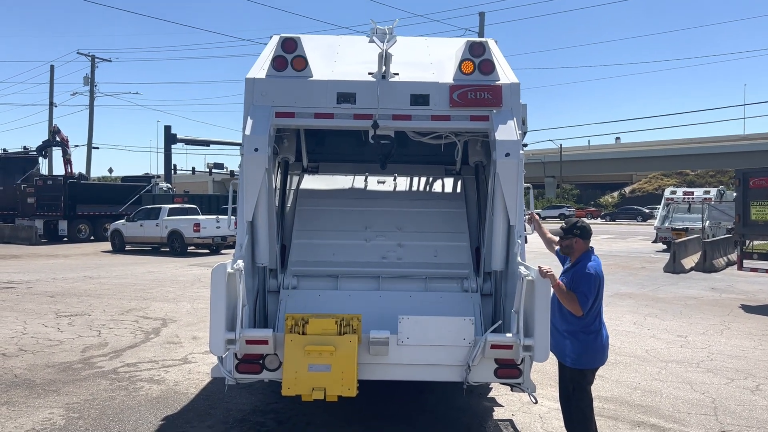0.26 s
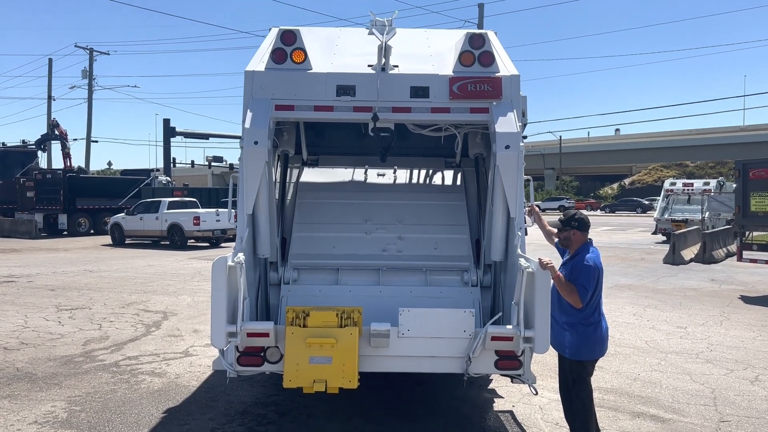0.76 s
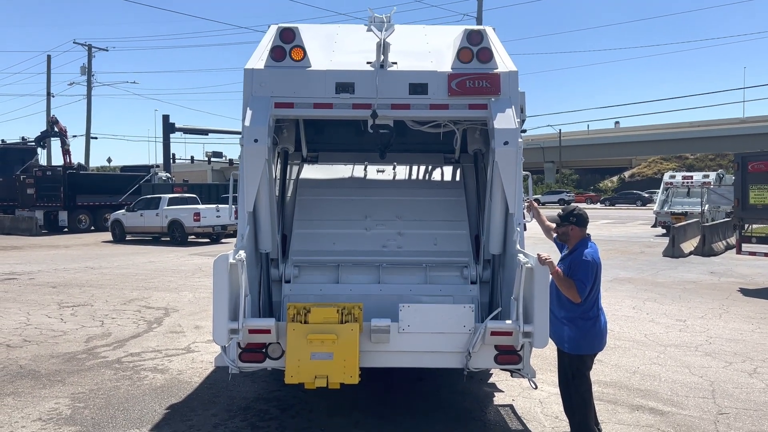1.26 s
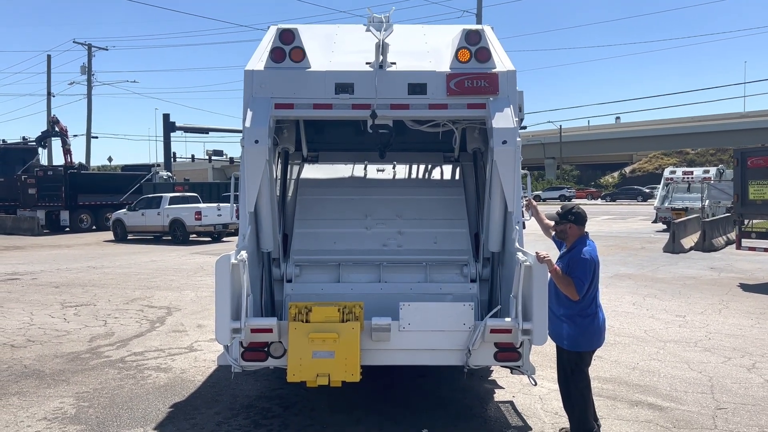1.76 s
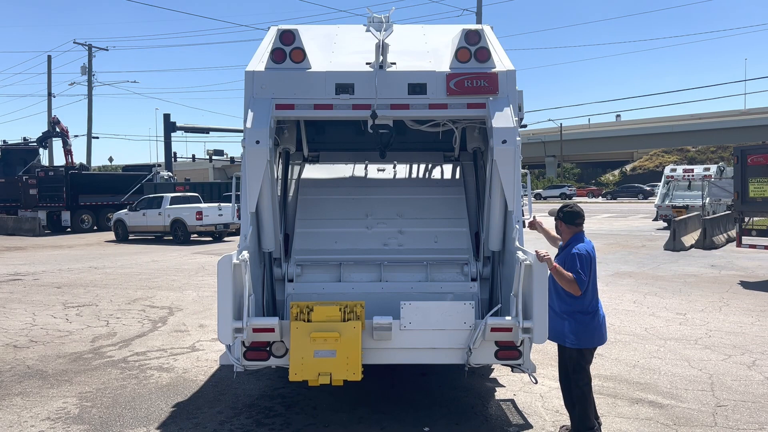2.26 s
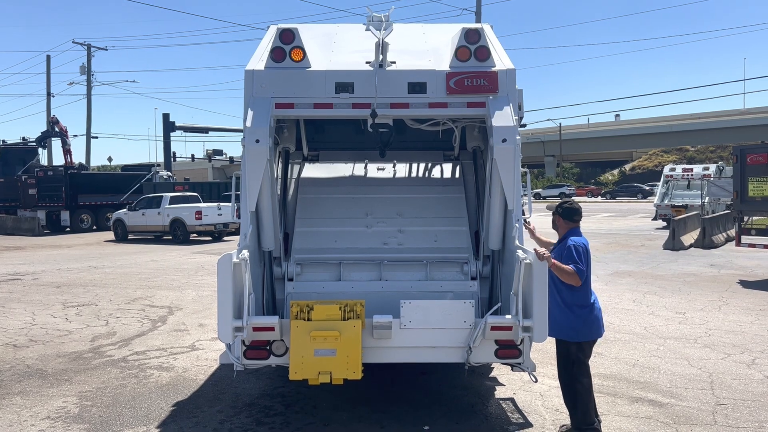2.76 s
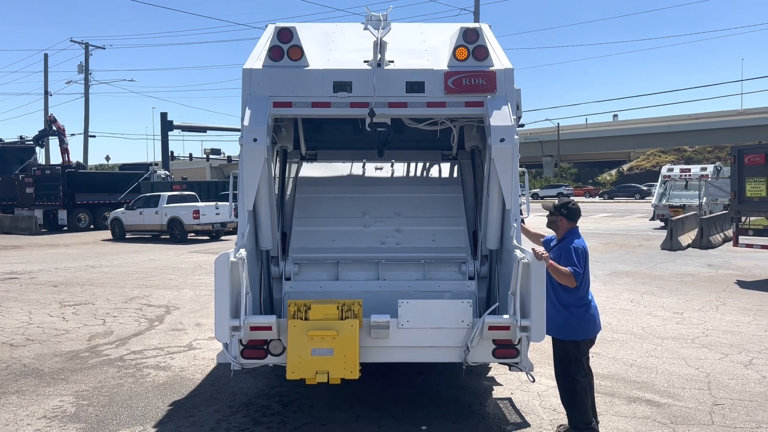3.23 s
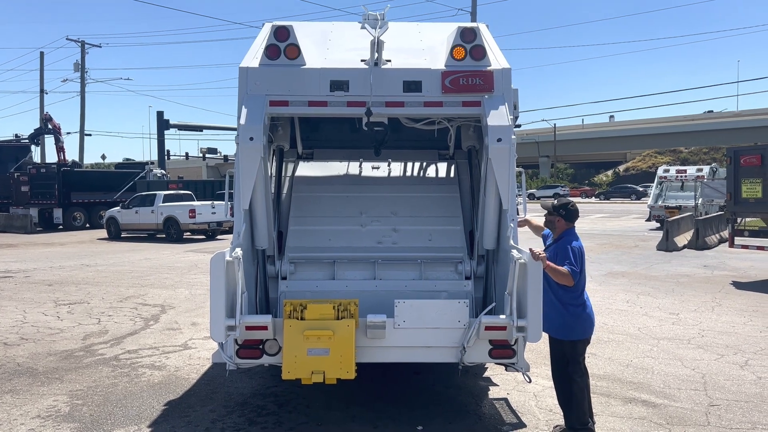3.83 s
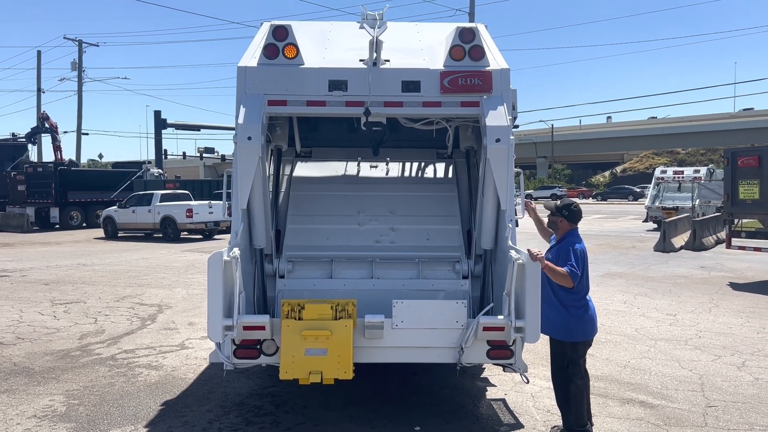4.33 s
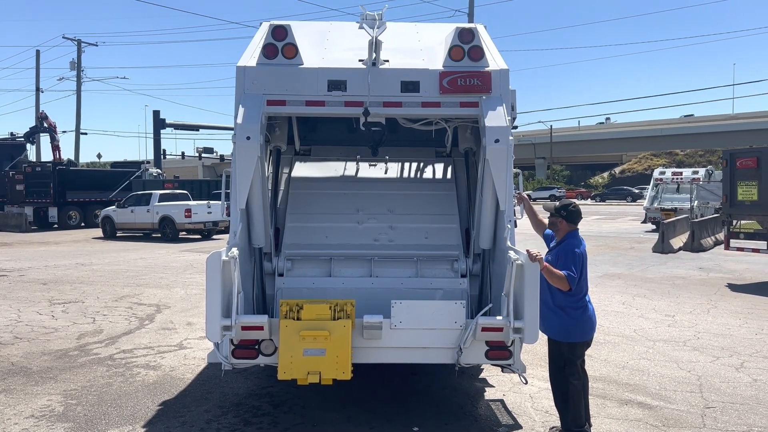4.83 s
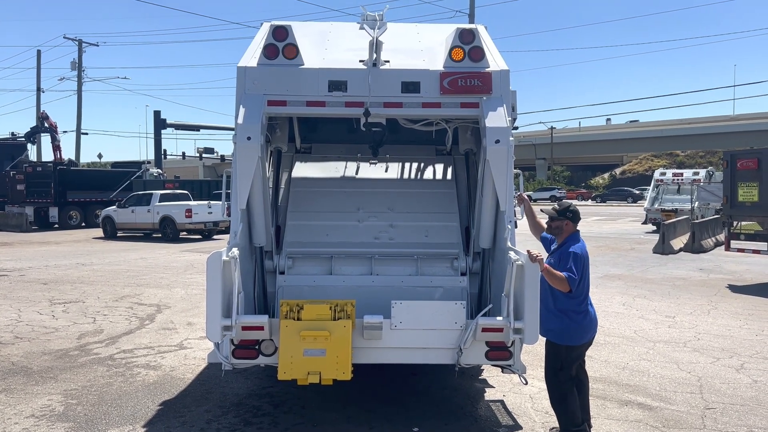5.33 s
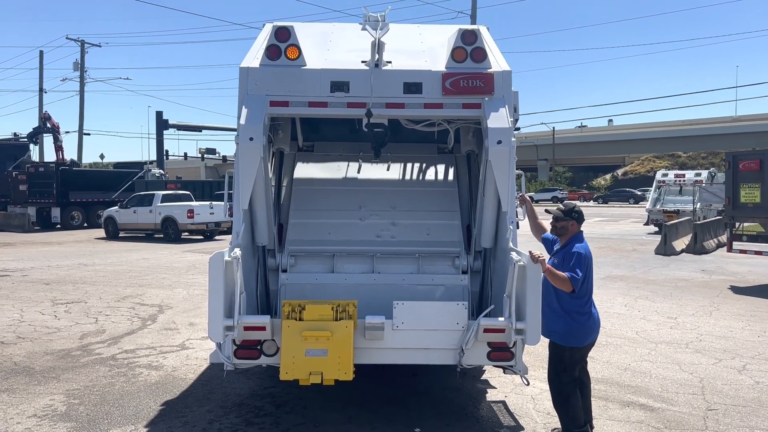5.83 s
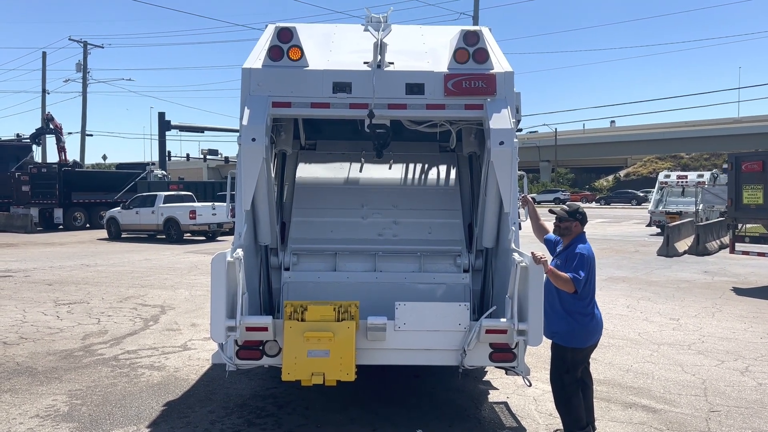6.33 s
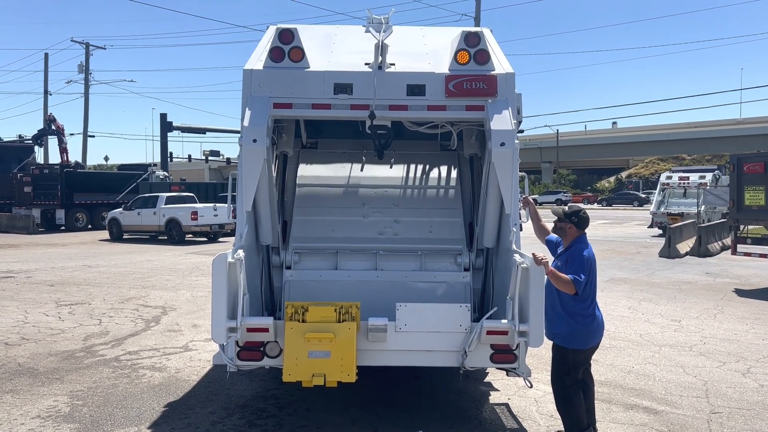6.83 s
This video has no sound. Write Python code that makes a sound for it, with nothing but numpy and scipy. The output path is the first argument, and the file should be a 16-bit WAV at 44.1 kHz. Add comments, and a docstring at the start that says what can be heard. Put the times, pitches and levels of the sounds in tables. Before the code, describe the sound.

Close by in an open lot, a garbage truck's diesel engine clatters steadily over a humming hydraulic pump. Steel clunks set the packer blade moving, and a piercing, stuttering squeal follows it, with a clank partway. The blade ends with a loud bang and hollow booms as the engine slows. A soft air hiss flutters while the revs climb and settle to a fast idle again.

```python
"""A six-cylinder diesel refuse truck idles fast in an open lot, a few metres from the listener.
Its cylinders knock, its exhaust drums the panels and a hydraulic pump hums on the crank. The packer
blade clunks off, squeals in stick-slip along its slides and bangs at the stop, ringing the hopper.
The engine sags to low idle, then revs up again with a hiss of air."""
import sys
import numpy as np
from scipy import signal
from scipy.fft import rfft, irfft, next_fast_len
from scipy.io import wavfile
from scipy.ndimage import uniform_filter1d

SR = 44100
rng = np.random.default_rng(int(sys.argv[2]) if len(sys.argv) > 2 else 0)


def master_out(mix):
    """Clip the mix to full scale and print it as 16-bit PCM to the path in sys.argv[1]."""
    frames = np.transpose(np.atleast_2d(mix))
    ceiling = np.clip(frames, -1, 1)
    pcm = np.round(ceiling * 32767).astype(np.int16)
    wavfile.write(sys.argv[1], SR, pcm)


N = 312669

WORKING_HZ = 21.6  # crank turns per second at fast idle
# engine revs: time_s, crank_hz
SPEED = [(0, 21.66), (1.45, 21.66), (1.75, 20.9), (2.3, 21.62), (2.82, 21.8), (3.1, 18.2), (3.3, 15.5),
         (3.5, 13.6), (3.75, 12.2), (4.15, 12.2), (4.35, 13.8), (4.8, 19.6), (5.12, 22.1), (5.35, 21.95),
         (5.7, 21.68), (7.09, 21.62)]
# the blade's travel: start_s, end_s
STROKE = (1.59, 3.36)


def undb(db):
    return 10 ** (np.asarray(db) / 20)


def unit(x):
    return x / np.sqrt(np.mean(x ** 2))


def curves(table):
    """Columns of a time table at every sample."""
    s, *columns = np.transpose(table)
    return [np.interp(np.arange(N) / SR, s, c) for c in columns]


def held(start, end, db, end_db, rise_db_s, fall_db_s):
    """Envelope in dB: climbs until start, glides from db to end_db, falls after end."""
    t = np.arange(N) / SR
    hold_db = np.interp(t, [start, end], [db, end_db])
    return hold_db - rise_db_s * np.clip(start - t, 0, None) - fall_db_s * np.clip(t - end, 0, None)


def on_hz(points, size):
    """A frequency table at every FFT bin, interpolated on a log axis."""
    hz, value = np.transpose(points)
    return np.interp(np.log(np.arange(size // 2 + 1) * SR / size + 1), np.log(hz), value)


def colour(x, points):
    """Equalise by a curve that falls away past its ends; rms 1."""
    (lo_hz, lo_db), (hi_hz, hi_db) = points[0], points[-1]
    closed = [(lo_hz / 16, lo_db - 120)] + list(points) + [(hi_hz * 16, hi_db - 120)]
    size = next_fast_len(N)
    return unit(irfft(rfft(x, size) * undb(on_hz(closed, size)), size)[:N])


def walk(rate_hz):
    """Smooth random drift with a spread near 1."""
    hold = int(SR / rate_hz)
    steps = np.repeat(rng.standard_normal(N // hold + 1), hold)
    return 1.63 * uniform_filter1d(uniform_filter1d(steps, hold), hold)[:N]


def sine(turns):
    """Sine of rms 1 with a random starting phase."""
    return np.sqrt(2) * np.sin(2 * np.pi * (turns + rng.random()))


def ring(x, modes):
    """Decaying modes driven by x."""
    out = 0
    for hz, db, t60 in modes:
        pole = np.exp(2j * np.pi * hz / SR - np.log(1000) / (t60 * SR))
        out = out + undb(db) * np.sqrt(1 - abs(pole)) * 2 * signal.lfilter([1], [1, -pole], x).imag
    return out / np.sqrt(len(modes))


def pump_hum(turns, unrest, hum_db, octave_db):
    """The hydraulic pump's teeth hum; unloaded, its drive slips to and fro and the hum flutters."""
    teeth = 10
    slack = 0.2 * unrest * walk(13)
    return sum(undb(db - 5.55 * k * unrest * abs(walk(40))) * sine(k * (teeth * turns + slack))
               for k, db in ((1, hum_db), (2, octave_db)))


def firing_tones(turns, crank_hz, fuel_db):
    """Two unequal exhaust groups drone; the casing carries them best near working speed."""
    # engine orders: crank_multiple, level_db
    orders = [(2.5, -42.5), (6, -36.5), (7.5, -65), (9, -54), (12, -54.5), (13, -74), (13.5, -48.5),
              (14.5, -69), (23, -75), (24, -47.5), (25.5, -43.5), (26, -42.5), (27, -35.5), (28.5, -52),
              (30, -64), (31.5, -50.5), (34, -54), (40, -50), (48, -49), (51, -53), (52, -48), (54, -48),
              (56, -49.5)]
    tones = sum(undb(db + 1.46 * walk(9)) * sine(k * turns) for k, db in orders)
    return tones * undb(fuel_db) / (1 + ((crank_hz - WORKING_HZ) / 6.6) ** 2)


def diesel_knock(turns, clatter_db):
    """Three firings a turn pulse a noise that clatters in the block and rattles the engine cover."""
    # knock of each cylinder: level_db
    cylinders_db = [6, -7, -6, 0.5, -20, -8]
    # clatter spectrum: freq_hz, level_db
    clatter_eq = [(90, -4.5), (180, -8.5), (300, -13), (390, -17), (600, -15.5), (800, -14), (1150, -17),
                  (1500, -17.5), (1800, -21.5), (2250, -20.5), (2940, -33), (3500, -29.5), (4500, -37.5),
                  (9000, -46)]
    # modes of the block and the cover: pitch_hz, level_db, t60_s
    block_modes = [(725, 18, 0.021), (1046, -10, 0.1), (2157, 3.5, 0.073), (3490, -2.5, 0.042)]
    cover_modes = [(1136, 11, 0.27), (1088, 17, 0.28), (1330, -10, 0.038), (1365, 19, 0.067)]
    # cover rattle: time_s, level_db
    cover_envelope = [(0, -45), (1.4, -49), (1.8, -63), (4.5, -51), (5.3, -51.5), (7.09, -46)]
    firing, phase = np.divmod(3 * turns, 1)
    firing = firing.astype(int)
    knock_db = np.array(cylinders_db)[firing % 6] + 2.0 * rng.standard_normal(600)[firing]
    pulse = 1 + 0.23 * undb(knock_db) * np.exp(-phase / 0.18)
    shake = pulse * rng.standard_normal(N)
    clatter = colour(shake, clatter_eq) + 0.19 * unit(ring(shake, block_modes))
    cover = unit(ring(shake, cover_modes)) * undb(curves(cover_envelope)[0])
    return clatter * undb(clatter_db + 0.43 * walk(7)) + cover


def exhaust_drum(turns, fuel_db, drum_db):
    """The exhaust throbs at the firing rate over drumming panels, swelling and sinking irregularly."""
    beat = undb(2.9 * walk(11) + 0.85 * fuel_db) * sine(3 * turns)
    panels = colour(rng.standard_normal(N), [(40, -10), (55, 6.5), (75, 3.0), (95, -3.5)])
    return (0.59 * beat + 0.66 * panels) * undb(drum_db + 1.5 * walk(5.165))


def engine():
    """One crank drives pump, drone, knock and exhaust; the governor hunts at low fuel or low revs."""
    # throttle, and the pump's overtone: time_s, fuel_db, pump_octave_db
    fuelling = [(0, -1, -48), (2.82, 0.5, -40.5), (2.97, -10, -32), (3.05, -18.5, -32.5), (3.3, -18, -33),
                (4.1, -12.5, -35.5), (4.8, -8, -32.5), (5.7, -4, -43.5), (7.09, -1, -34.5)]
    # levels of pump hum, clatter and exhaust rumble: time_s, pump_db, clatter_db, drum_db
    levels = [(0, -26, -28.5, -30), (1.42, -25.5, -29, -31), (1.58, -34, -29, -25),
              (1.9, -33.5, -24.5, -23), (2.05, -28.5, -25.5, -28), (2.3, -24.5, -25.5, -23),
              (2.55, -30, -26, -27), (2.8, -24, -30, -30.5), (3.3, -25, -32, -26.5), (3.9, -25, -36, -27),
              (4.15, -24.5, -32, -29), (4.35, -29.5, -32.5, -25), (4.68, -25.5, -28, -28.5),
              (4.88, -24.5, -26.5, -17.5), (5.35, -27.5, -30, -27.5), (5.8, -29.5, -29, -32),
              (6.2, -27, -29.5, -30), (6.42, -26.5, -29.5, -24), (6.7, -25, -29, -36),
              (7.09, -30.5, -29, -28)]
    crank_hz = curves(SPEED)[0]
    fuel_db, octave_db = curves(fuelling)
    pump_db, clatter_db, drum_db = curves(levels)
    unrest = np.clip(np.maximum(-fuel_db / 10, (WORKING_HZ - crank_hz) / 1.55), .04, 1)
    turns = np.cumsum(crank_hz * (1 + 0.014 * unrest ** 2 * walk(25.016))) / SR
    return (pump_hum(turns, unrest, pump_db, octave_db) + firing_tones(turns, crank_hz, fuel_db)
            + diesel_knock(turns, clatter_db) + exhaust_drum(turns, fuel_db, drum_db))


def oil_and_steel_hiss():
    """Oil hisses with engine speed; sliding steel adds to it along the stroke."""
    # hiss spectrum: freq_hz, level_db
    hiss_eq = [(2500, 5), (3500, -1), (4600, -1), (6000, 8), (7600, -10), (9000, 0.5), (11800, -4.5),
               (13000, -11), (15500, -23)]
    oil = undb(-52) * (curves(SPEED)[0] / WORKING_HZ) ** 1.7
    steel = undb(held(*STROKE, -41.5, -41.5, rise_db_s=150, fall_db_s=150))
    return colour(rng.standard_normal(N), hiss_eq) * np.hypot(oil, steel) * undb(0.27 * walk(5.17))


def blade_blows():
    """Each blow rattles for a moment, rings the hopper and leaves a dying spray of noise."""
    # hits: start_s, rattle_s, tail_t60_s, boom_db, panel_db, clank_db, plate_db, tick_db, ping_db
    hits = [(1.414, 0.013, 0.3, -52, -21, -23, -30, -40, -53),
            (1.435, 0.014, 0.35, -49, -27, -25, -43, -36, -28.5),
            (1.457, 0.043, 0.64, -35, -15, -30, -34, -45, -48),
            (1.513, 0.043, 1, -26, -25, -30, -50, -50, -48),
            (1.571, 0.034, 1, -27, -30, -50, -60, -52, -60),
            (1.724, 0.02, 0.66, -31, -23.5, -38, -50, -38, -50),
            (1.783, 0.021, 0.21, -30, -33.5, -37, -50, -48, -65),
            (2.644, 0.024, 0.63, -56, -25.5, -23.5, -31, -59, -60),
            (2.665, 0.0029, .05, -55, -33, -26, -44, -54, -60),
            (2.687, 0.019, 0.54, -56, -29, -34, -50, -60, -60),
            (2.725, 0.012, 0.53, -56, -32, -45, -50, -60, -60),
            (3.331, 0.011, 0.42, -50, -27, -29, -31, -60, -60),
            (3.346, 0.014, 0.57, -41, -15.5, -18, -21, -29, -30),
            (3.366, 0.0071, 0.39, -21.5, -36, -21, -13, -31, -26),
            (3.379, 0.0156, 1, -22, -20.5, -33, -27, -51, -48),
            (3.477, 0.029, 0.56, -25, -36, -39, -48, -58, -65),
            (3.499, 0.03, 0.55, -21.5, -36, -41, -50, -60, -65),
            (3.54, 0.13, .98, -21, -31.5, -44, -44, -53, -65),
            (3.74, 0.017, 0.32, -27, -34, -44, -56, -38, -54),
            (3.75, 0.016, 0.47, -45, -29, -34, -55, -52, -60),
            (3.793, 0.018, 0.28, -47, -33.5, -47, -55, -61, -65),
            (3.851, 0.012, 0.14, -36, -25.5, -34, -55, -61, -65),
            (3.88, 0.011, .2, -45, -37, -45, -55, -61, -65),
            (3.908, 0.023, .3, -48, -31.5, -49, -55, -65, -65)]
    # modes of hopper floor, panels, clank, stop plate and small fittings: pitch_hz, level_db, t60_s
    floor_modes = [(66, -13, 1), (80, 0.5, 0.33), (84.8, -13, 0.56)]
    panel_modes = [(147, -27, 0.15), (230.8, 6, 1), (291, 3, 0.76), (339.7, -6, 0.46), (534, -4, 0.44),
                   (680, -8, 0.45), (687, -24, 0.23)]
    clank_modes = [(760, 0, .1), (868, 2.5, 0.14), (940, 4, 0.13), (1030, 6, 0.27), (1134, 8, 0.13),
                   (1158, 2, 0.083), (1350, -11, .15), (1300, -3, 0.17), (1810, -13, 0.11),
                   (2078, 0, 0.077), (2247, 0, 0.14), (2470, -1, 0.1), (2800, -25, 0.063),
                   (2815, -6, 0.027), (3140, -11, 0.077)]
    plate_modes = [(1540, -5, .12), (1588, 4, 0.33), (1650, -1, .2), (1760, -4, 0.15)]
    ping_modes = [(3270, -2, .06), (3400, -10, .25), (4500, -0.5, .05), (4646, -11.5, .06), (4830, -8, .05),
                  (4950, -7, 0.057), (6200, -11, .03)]
    # spectra of the noise tails: freq_hz, level_db
    tick_eq = [(3000, -20), (4800, -4.5), (6200, -8), (7600, -5.5), (9500, -6), (12000, -15), (15500, -22)]
    panel_eq = [(150, 7.5), (350, 1.0), (600, -2.5), (900, -5.0)]
    clank_eq = [(700, -2.0), (1600, 4.0), (2400, -5.5), (3300, -11.5)]
    tail_scale = np.array([[1], [.7], [.5]])  # treble dies first
    rattles, tails, thumps = np.zeros((4, N)), np.zeros((3, N)), np.zeros(N)
    for start_s, rattle_s, t60, boom_db, panel_db, clank_db, plate_db, tick_db, ping_db in hits:
        start = int(start_s * SR)
        span = slice(start, start + 2 * SR)
        age = np.arange(min(N - start, 2 * SR)) / SR
        rise = np.clip(age / (0.32 * rattle_s), 0, 1)
        decay = np.log(1000) * np.clip(age - rattle_s, 0, None)
        rattle_gains = undb([panel_db, clank_db, plate_db, ping_db])
        tail_gains = undb([panel_db, clank_db, tick_db])
        rattles[:, span] += rattle_gains[:, None] * rise * np.exp(-decay / 0.008)
        tails[:, span] += tail_gains[:, None] * rise * np.exp(-decay / (t60 * tail_scale))
        rattles[:, start + 40] += 12 * rattle_gains  # the hard first contact
        thumps[start] = 60 * undb(boom_db)
    push = np.hanning(int(0.0036 * SR))  # the heavy floor takes a soft push
    out = ring(np.convolve(thumps, 2 * push / push.sum())[:N], floor_modes)
    chatter = undb(1.35 * walk(120))  # loose plates make the rest lumpy
    parts = [(panel_modes, .9), (clank_modes, .8), (plate_modes, .8), (ping_modes, 1.6)]
    for rattle, (modes, gain) in zip(rattles, parts):
        out += gain * ring(chatter * rattle * rng.choice([-1., 1.], N), modes)
    for tail, eq in zip(tails, (panel_eq, clank_eq, tick_eq)):
        out += 0.61 * chatter * tail * colour(rng.standard_normal(N), eq)
    return out


def wavering_tone(hz, db, rough_db, waver, octave_db=None):
    """A tone unsteady in pitch and level, with an optional octave."""
    turns = np.cumsum(hz * (1 + waver * walk(150))) / SR
    tone = undb(db) * sine(turns)
    if octave_db is not None:
        tone = tone + undb(octave_db) * sine(2 * turns)
    return tone * undb(rough_db * walk(90))


def slide_squeal():
    """A thin stick-slip squeal runs along the stroke; it swells and sinks in pitch as the slides grip."""
    # hard grips: full_s, until_s, pitch_hz, level_db, end_db
    grips = [(1.6, 1.63, 6712, -32, -33), (1.83, 1.9, 6668, -17.5, -22), (2.0, 2.265, 6692, -18, -17.5),
             (2.335, 2.43, 6696, -25, -18.5), (2.43, 2.845, 6680, -18, -18), (2.955, 2.985, 6680, -16, -22),
             (3.165, 3.27, 6698, -21, -18), (3.3, 3.33, 6710, -30, -28), (3.34, 3.354, 6700, -24, -25)]
    # brief flickers of the thin squeal, mostly dips: time_s, change_db
    flickers = [(1.683, -19), (1.94, -3), (2.3, 3), (2.9, -12)]
    # the squeal's octave: time_s, level_db
    octave = [(1.59, -59.5), (1.79, -62), (1.83, -54), (1.89, -46), (1.945, -59), (2.005, -39.5),
              (2.25, -41), (2.3, -44), (2.43, -45), (2.83, -51), (2.92, -58), (2.96, -39), (3.03, -45),
              (3.1, -46), (3.2, -39), (3.27, -41), (3.3, -48), (3.345, -41), (3.365, -75)]
    thin_hz, bite_s, slip_db_s = 6712, 1.592, 650
    t = np.arange(N) / SR
    thin_db = held(*STROKE, -35.5, -35.5, rise_db_s=slip_db_s, fall_db_s=70)
    thin_db -= 13 * (t > STROKE[1])  # steps down as the blade stops
    thin_db += sum(db * np.exp(-((t - s) / 0.0094) ** 2) for s, db in flickers)
    grips_db = [held(start, end, db, end_db, rise_db_s=480, fall_db_s=slip_db_s)
                for start, end, _, db, end_db in grips]
    levels_db = np.array([thin_db] + grips_db)
    db = levels_db.max(axis=0)
    weights = undb(levels_db - db) ** 2  # the loudest pulls the pitch its way
    hz = np.array([thin_hz] + [grip[2] for grip in grips]) @ weights / weights.sum(axis=0)
    db -= 2500 * np.clip(bite_s - t, 0, None)  # abrupt attack
    octave_db = np.where((t > STROKE[0]) & (t < octave[-1][0]), curves(octave)[0], db - 55)
    rough_db = 0.6 + 0.2 * np.clip(-20.5 - db, 0, 20)  # rougher when quiet
    squeal = wavering_tone(hz, db, rough_db, waver=0.0003, octave_db=octave_db)
    rasp = undb(0.5 * walk(420))
    return squeal * rasp


def faint_tones():
    """Faint, rough tones come and go during the stroke; a last one whistles as the air hiss starts."""
    # tones: start_s, end_s, pitch_hz, level_db
    tones = [(1.583, 1.59, 6160, -40), (1.592, 1.606, 6030, -34), (1.615, 1.665, 6020, -47),
             (1.72, 1.82, 6050, -56), (1.82, 2.02, 5540, -57), (2.02, 2.24, 5460, -49),
             (2.243, 2.462, 5420, -45), (2.45, 2.8, 5020, -52), (2.962, 2.965, 3810, -44),
             (2.988, 2.993, 3780, -44), (2.937, 3.06, 6100, -49), (2.987, 3.27, 5440, -46),
             (3.036, 3.13, 3360, -49), (3.203, 3.274, 3790, -49), (3.21, 3.3, 6030, -52),
             (3.28, 3.31, 5450, -42), (3.27, 3.32, 3330, -50), (3.335, 3.36, 7130, -41),
             (4.13, 4.23, 4460, -60)]
    out = 0
    for start, end, hz, db in tones:
        level_db = held(start, end, db, db, rise_db_s=1200, fall_db_s=1200) + 1.5 * walk(45.36)
        tone = wavering_tone(hz, level_db, rough_db=1.5, waver=0.002)
        grain = 1 + 0.35 * walk(300)
        out = out + tone * grain
    return out


def air_leak():
    """A valve leaks a fluttering hiss of air as the revs return."""
    # leak envelope: time_s, level_db
    envelope = [(4.08, -63), (4.15, -48), (4.3, -57), (4.66, -50), (5.16, -53.5), (5.22, -79)]
    # leak spectrum: freq_hz, level_db
    air_eq = [(3000, -22), (4500, 5), (5500, 10), (7000, 4), (8000, -10), (9400, 9.5), (12000, -52)]
    return colour(rng.standard_normal(N), air_eq) * undb(curves(envelope)[0] + 1.4 * walk(34))


def scene():
    """Ground and parked trucks scatter the sound into stereo; the squeal beams straight but wanders."""
    # scatter in the side channel: freq_hz, level_db
    scatter_eq = [(100, -23), (300, -17), (700, -7), (1500, -1), (2600, -5.5), (4500, -2), (6000, 0.5),
                  (7500, -2), (9500, -9), (11000, -80), (15000, -25)]
    # phase by which the right channel leads: freq_hz, lead_rad
    right_lead = [(100, -0.12), (600, 0.057), (1500, -0.064), (3000, -0.86), (5000, -1.3), (7300, -0.93),
                  (8300, 0.049)]
    echo_t60_s, treble_lag_s = 0.23, 0.00026
    size = next_fast_len(N + SR)
    squeal = slide_squeal() + faint_tones()
    pan = np.tanh(0.25 * walk(8.13))
    mid, side = rfft(squeal, size), rfft(squeal * pan, size)
    echo_decay = np.exp(-np.log(1000) * np.arange(SR // 4) / SR / echo_t60_s)
    scatter = undb(on_hz(scatter_eq, size) + 0.1)
    for sound in (engine(), oil_and_steel_hiss() + air_leak(), blade_blows()):
        echo = unit(rng.standard_normal(SR // 4) * echo_decay) / np.sqrt(SR // 4)
        spectrum = rfft(sound, size)
        mid += spectrum
        side += spectrum * rfft(echo, size) * scatter
    # the top treble reaches the left channel later
    above_hz = np.clip(np.arange(len(mid)) * SR / size - right_lead[-1][0], 0, None)
    lead = np.exp(.5j * (on_hz(right_lead, size) + 2 * np.pi * treble_lag_s * above_hz))
    return irfft(np.array([(mid + side) / lead, (mid - side) * lead]), size)[:, :N]


def record(dry):
    """The microphone cuts the deepest bass, rounds the loudest peaks and cuts the top."""
    low_cut = signal.butter(3, 38, "high", fs=SR, output="sos")
    high_cut = signal.ellip(12, .2, 80, 15900, fs=SR, output="sos")
    return signal.sosfilt(high_cut, np.tanh(signal.sosfilt(low_cut, dry)))


dry = scene()
out = record(dry)
master_out(out)
```